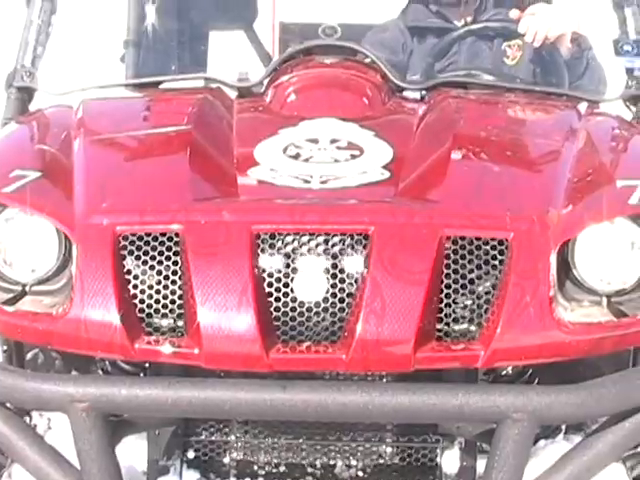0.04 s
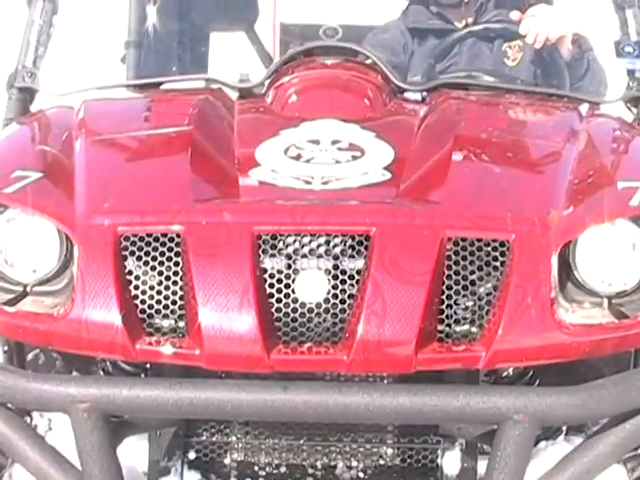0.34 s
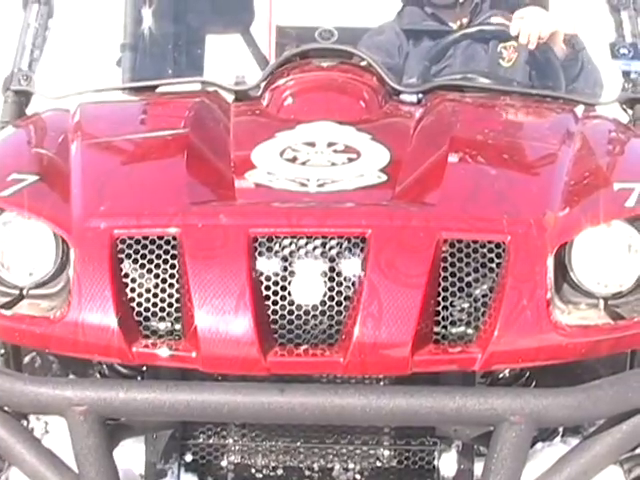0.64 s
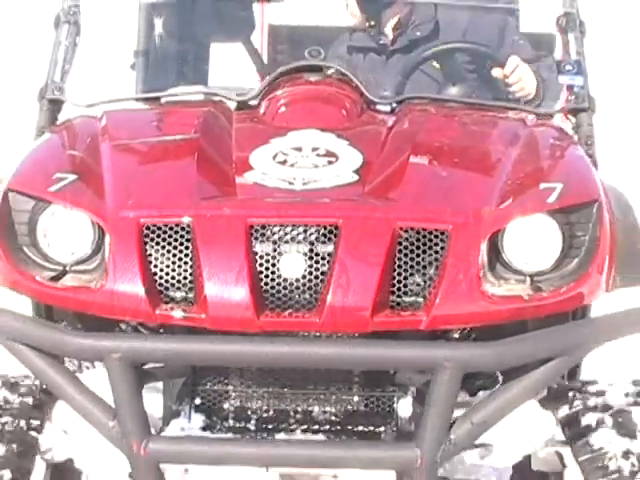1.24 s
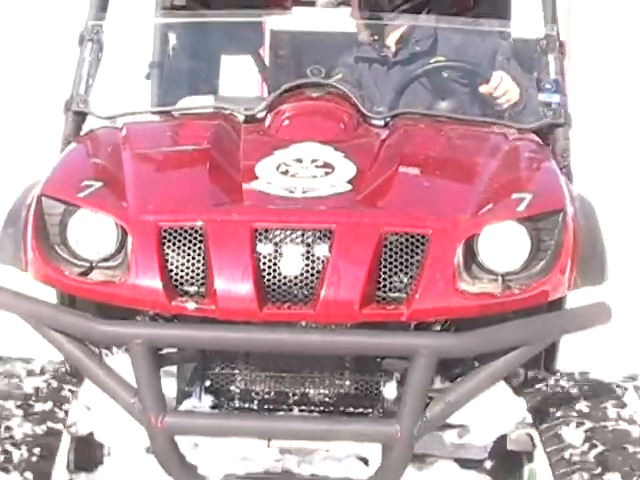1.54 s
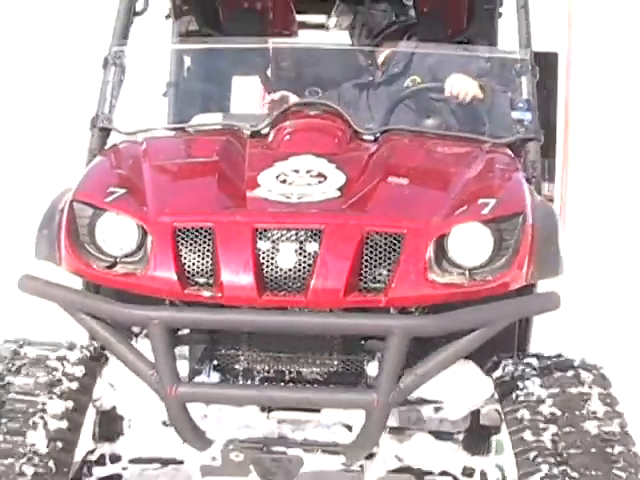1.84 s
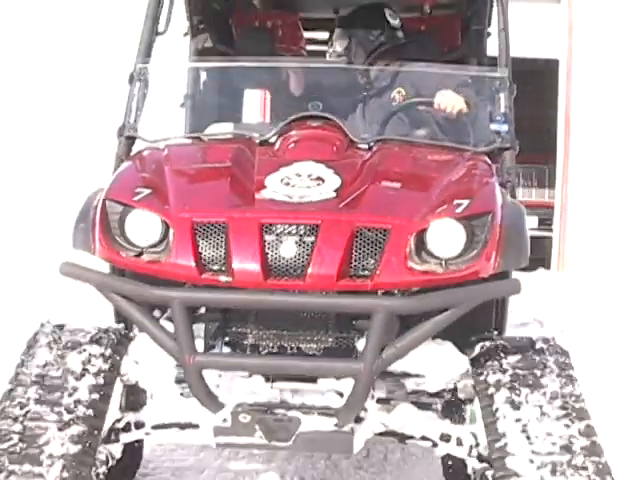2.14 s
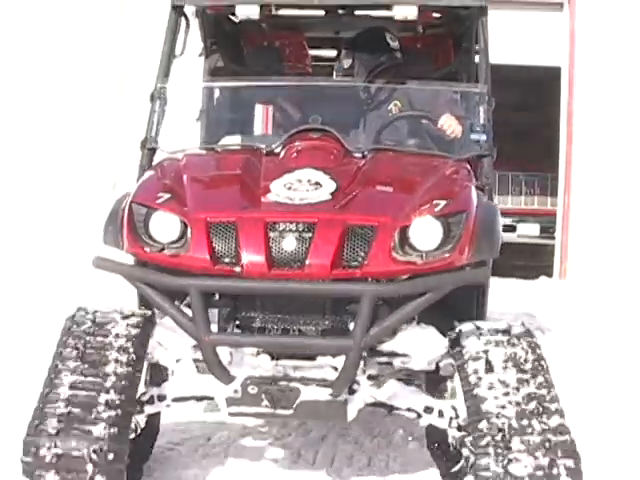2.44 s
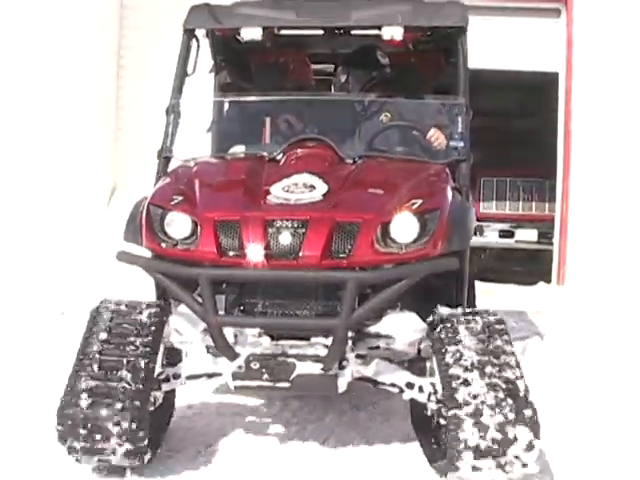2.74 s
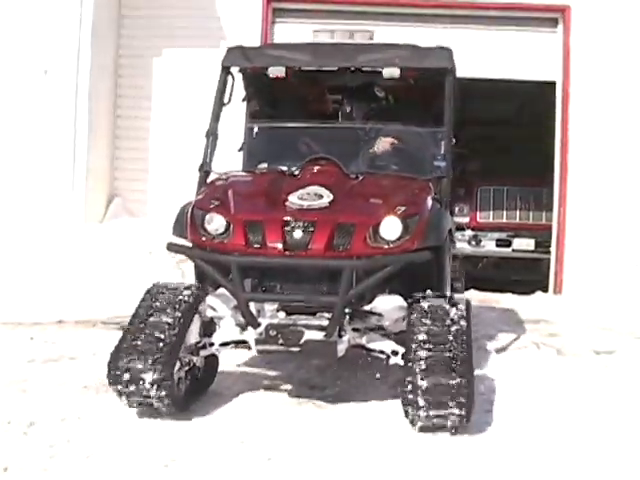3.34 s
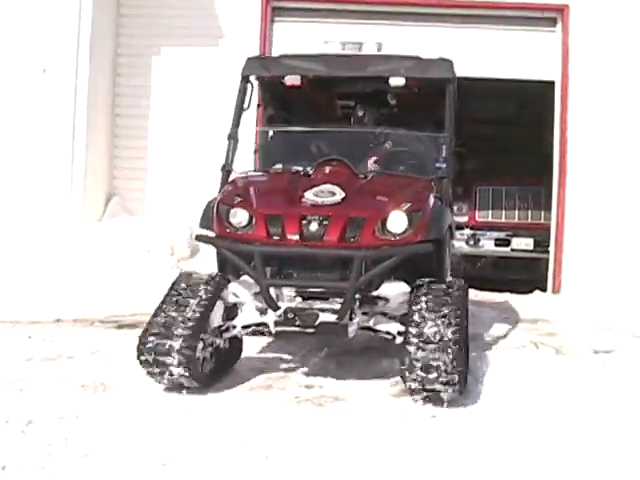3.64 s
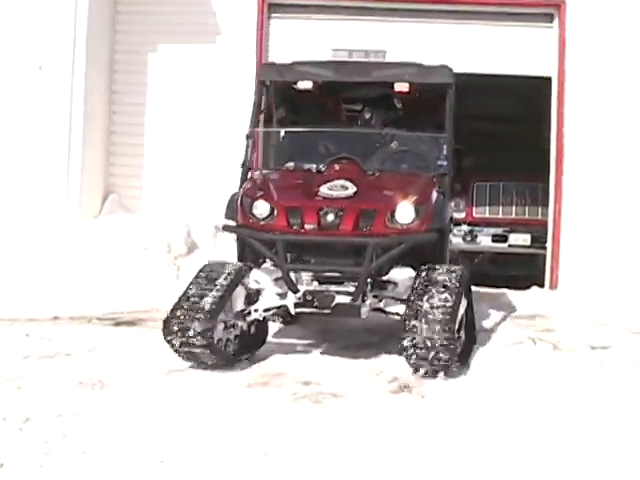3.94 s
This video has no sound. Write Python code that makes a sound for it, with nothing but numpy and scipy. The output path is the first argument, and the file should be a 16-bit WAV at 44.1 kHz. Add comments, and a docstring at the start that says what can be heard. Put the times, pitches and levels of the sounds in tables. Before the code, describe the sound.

A small off-road vehicle's engine idles close by with slow thumps. After a click it jumps to a louder, rattling drone that rises in pitch, while its tracks rustle and tick on icy snow.

```python
"""Slow thumps, about 13 a second: a single-cylinder utility vehicle on snow tracks idles close by.
With a click the sound jumps to the engine under load, the vehicle driving over snow.
Each firing sends a pulse down the exhaust, each gulp of air honks in the intake, and the panels rattle.
The drive belt whines briefly; the tracks rustle and tick on icy snow.
All of it reaches a stereo microphone pair whose sides differ in phase and level."""
import sys
import numpy as np
from scipy import signal
from scipy.fft import rfft, irfft, next_fast_len
from scipy.io import wavfile
from scipy.ndimage import uniform_filter1d

SR = 44100
rng = np.random.default_rng(int(sys.argv[2]) if len(sys.argv) > 2 else 0)


def master(y):
    """Save y as 16-bit WAV."""
    cut = np.clip(np.atleast_2d(y).T, -1, 1)
    pcm = np.round(cut * 32767)  # scale
    wavfile.write(sys.argv[1], SR, pcm.astype(np.int16))


N = 176400
TIME = np.arange(N) / SR
FFT_SIZE = next_fast_len(N + SR // 2, True)
HZ = np.maximum(np.arange(FFT_SIZE // 2 + 1) * SR / FFT_SIZE, 1)
IDLE_START_S, LOAD_START_S = .002, .834

# Engine speed under load: (time [s], firing rate [Hz])
LOAD_FIRING_RATE = [(0.847, 25.49), (1.2, 26.08), (1.62, 26.06), (1.9, 24.75), (2.2, 27.55), (2.45, 29.1),
                    (2.8, 31.57), (3.27, 33.34), (3.6, 32.87), (4.0, 32.35)]
# Intake honk following the throttle: (time [s], relative level [dB], starting pitch [Hz])
INTAKE_HONK = [(.85, -24, 844), (1.3, -26, 851), (1.65, -30, 857), (1.8, -35.5, 837), (2.2, -35, 810),
               (2.45, -29, 830), (2.7, -23, 848), (3.2, -22, 847), (3.48, -21, 846), (3.7, -20.5, 855),
               (4, -21, 857)]


def from_db(db):
    """Decibels to gain."""
    return 10 ** (np.asarray(db) / 20)


def in_time(rows, column=1):
    """One column of a time table at every sample."""
    rows = np.array(rows)
    return np.interp(TIME, rows[:, 0], rows[:, column])


def at_hz(points):
    """A spectrum table at every frequency."""
    hz, value = np.transpose(points)
    return np.interp(np.log(HZ), np.log(hz), value)


def colour(x, points):
    """Causal (minimum-phase) filter with the given gains in dB."""
    cepstrum = irfft(np.log(from_db(at_hz(points))), FFT_SIZE)
    cepstrum[1:FFT_SIZE // 2] *= 2
    cepstrum[FFT_SIZE // 2 + 1:] = 0
    return irfft(rfft(x, FFT_SIZE) * np.exp(rfft(cepstrum)), FFT_SIZE)[..., :N]


def poles(hz, width_hz):
    """Feedback coefficients of one resonance."""
    radius = np.exp(-np.pi * width_hz / SR)
    return np.array([1, -2 * radius * np.cos(2 * np.pi * hz / SR), radius ** 2])


def white(diffuse_db=-17.5):
    """Stereo noise of about 0 dB per Hz, mostly common to both sides."""
    mid, side = rng.standard_normal((2, N)) * np.sqrt(SR / 2)
    return mid + from_db(diffuse_db) * np.array([side, -side])


def impulses(times, gains):
    """One impulse at each time."""
    train = np.zeros(N)
    inside = (times >= 0) & (times < TIME[-1])
    train[(times[inside] * SR).astype(int)] = gains[inside]
    return train


def engine_cycles(rate, start_s):
    """Running count of engine cycles since start_s."""
    return np.cumsum(rate * (TIME >= start_s)) / SR


def exhaust_pulses(rate, start_s, jitter_s=.00011, uneven_db=.5, count=120):
    """One pressure pulse for each firing, slightly uneven in time and strength."""
    timing, strength = rng.standard_normal((count, 2)).T
    times = np.interp(np.arange(count) + 1e-6, engine_cycles(rate, start_s), TIME, right=np.inf)
    firings = impulses(times + jitter_s * timing, from_db(uneven_db * strength))
    return firings * SR / (np.sqrt(2) * rate)  # low harmonics have an rms near 1


def engine_under_load(under_way_s=(2.15, 2.7), honk_gain_db=7.5):
    """Exhaust drone, intake honk and clatter; the drone changes colour as the vehicle gets under way."""
    # Exhaust pipe pulling away, then under way: (frequency [Hz], gain [dB])
    pulling_pipe = [(26, -48.5), (52, -35.5), (78, -22.5), (104, -17.5), (135, -29), (182, -21.5),
                    (210, -26), (234, -19), (283, -27.5), (335, -53.5), (700, -71), (2000, -105)]
    driving_pipe = [(33, -40.5), (65, -27), (98, -35), (130, -23), (162, -30), (200, -19.5), (232, -20),
                    (265, -24.5), (320, -34), (360, -43), (393, -37), (440, -47.5), (700, -78.5),
                    (2000, -100)]
    # Rattle of engine and panels: (frequency [Hz], gain [dB])
    rattle_colour = [(30, -63.5), (110, -44.5), (300, -52.5), (420, -52), (540, -46.5), (720, -56),
                     (1000, -63), (1220, -62.5), (1700, -71), (3000, -105.5)]
    # Strength of that rattle: (time [s], gain [dB])
    rattle_level = [(.85, -3.5), (1.1, -8.5), (1.65, -5), (2.15, -4), (2.45, -2), (2.8, -2.5), (3.2, -2),
                    (4, -2.5)]
    rate = in_time(LOAD_FIRING_RATE)
    pulses = exhaust_pulses(rate, LOAD_START_S)
    moving = np.interp(TIME, under_way_s, [0, 1])
    drone = colour(pulses * (1 - moving), pulling_pipe) + colour(pulses * moving, driving_pipe)
    honk = from_db(honk_gain_db + in_time(INTAKE_HONK)) * intake(rate, LOAD_START_S)
    rattle = from_db(in_time(rattle_level)) * clatter(pulses, rattle_colour)
    return silencer(drone) + honk + rattle


def engine_idling(honk_db=-39.5):
    """Close by, slow firings leave the pipe as separate thumps over light clatter and a faint honk."""
    # Wavering idle speed: (time [s], firing rate [Hz])
    firing_rate = [(0, 13.1), (.12, 13.4), (.27, 13.3), (.36, 13.9), (.55, 13.75), (.72, 12.95),
                   (.82, 13.7)]
    # Exhaust pipe at idle: (frequency [Hz], gain [dB])
    pipe = [(27, -44.5), (52, -47), (66, -27.5), (79, -19.5), (94, -36), (125, -35), (165, -24.5),
            (215, -23), (238, -23.5), (262, -48.5), (320, -53), (700, -62.5), (2000, -110)]
    # Rattle at idle: (frequency [Hz], gain [dB])
    rattle_colour = [(30, -60), (200, -44), (400, -61.5), (550, -58), (680, -67), (820, -57.5),
                     (930, -74.5), (1200, -69), (2300, -85), (3800, -81.5), (4350, -85), (4700, -82.5),
                     (5300, -90.5), (6800, -104), (9000, -104), (15000, -112)]
    rate = in_time(firing_rate)
    pulses = exhaust_pulses(rate, IDLE_START_S)
    rattle = clatter(pulses, rattle_colour)
    honk = from_db(honk_db) * intake(rate, IDLE_START_S)
    return colour(pulses, pipe) + rattle + honk


def silencer(drone, bass_edge_hz=90):
    """The chambers spread each pulse over the cycle; the deep bass follows its own level."""
    # Chamber resonances, near which the sound is held back: (frequency [Hz], width [Hz])
    chambers = [(104, 32.7), (282, 16.6)]
    # Deep bass under load: (time [s], gain [dB])
    bass_level = [(.85, 3), (2.05, -1.5), (2.4, -1.5), (2.8, -6.5), (3.2, 1.5), (4, 0.5)]
    for hz, width_hz in chambers:
        feedback = poles(hz, width_hz)
        drone = signal.lfilter(feedback[::-1], feedback, drone)  # all-pass
    bass = signal.sosfiltfilt(signal.butter(4, bass_edge_hz, fs=SR, output="sos"), drone)
    return drone + (from_db(in_time(bass_level)) - 1) * bass


def intake(rate, start_s, delay_s=.00657, uneven_db=.75, sag_hz_per_s=2480):
    """Each gulp of air gives a short honk that sags in pitch and rings on faintly."""
    attack_s, hold_s, release_s = .0045, .0055, .0061
    ring_db, ring_s = -7.5, .029
    cycles = engine_cycles(rate, start_s + delay_s)
    age = cycles % 1 / rate
    strength = from_db(uneven_db * rng.standard_normal(N))[cycles.astype(int)]
    gulp = np.interp(age, np.cumsum([0, attack_s, hold_s, release_s]), [0, 1, 1, 0])
    ring = from_db(ring_db) * np.sin(np.pi * np.minimum(age / ring_s, 1))
    mean_hz = in_time(INTAKE_HONK, column=2) - sag_hz_per_s * age / 2
    return strength * np.maximum(gulp, ring) * np.sin(2 * np.pi * mean_hz * age)


def clatter(pulses, spectrum, repeat_share=.55, ring_s=.13):
    """Engine and panels rattle partly alike on every cycle, partly at random."""
    age = TIME[:SR // 8]
    one_rattle = rng.standard_normal(len(age)) * np.exp(-age / ring_s)
    repeating = signal.fftconvolve(pulses, one_rattle)[:N]
    repeating *= np.sqrt(repeat_share * SR / 2) / repeating.std()
    return colour(repeating + np.sqrt(1 - repeat_share) * white(), spectrum)


def track_rush(throb_db=.5, lag_s=.0062, grain_db=1.48, grain_s=.0054):
    """Tracks and drive run over the snow with a grainy rush that throbs with the engine."""
    # Colour of the rush: (frequency [Hz], gain [dB])
    rush_colour = [(400, -76.5), (1000, -62), (1600, -65.5), (2300, -70), (4000, -74), (5200, -73.5),
                   (6000, -81.5), (7000, -92), (9300, -94), (11500, -108), (15000, -122)]
    # Swell of the rush: (time [s], gain [dB])
    rush_level = [(.85, -7), (1.65, -6), (2.15, -4), (2.8, -2.5), (3.25, 2), (3.48, 0), (3.7, 1.5),
                  (4, 1.5)]
    cycles = engine_cycles(in_time(LOAD_FIRING_RATE), LOAD_START_S + lag_s)
    throb = np.cos(2 * np.pi * cycles)
    grain = uniform_filter1d(rng.standard_normal(N), int(grain_s * SR))
    level_db = in_time(rush_level) + throb_db * throb + grain_db * grain / grain.std()
    return colour(white() * from_db(level_db), rush_colour)


def track_ticks(gain_db=3, decay_s=.004):
    """The tracks strike icy snow in short, bright bursts of noise."""
    # Strikes on the ice: (time [s], relative level [dB])
    strikes = [(1.9435, -44.5), (1.956, -52), (2.1892, -45), (2.2985, -44.5), (2.379, -36.5), (2.4744, -41),
               (2.5057, -43), (2.5694, -40.5), (2.727, -37.5), (3.1378, -44.5), (3.227, -57),
               (3.3844, -43.5), (3.554, -36.5), (3.581, -46.5), (3.6163, -40), (3.694, -44.5)]
    # Colour of a tick: (frequency [Hz], gain [dB])
    tick_colour = [(2000, -24.5), (5000, -10.5), (7000, -5), (9300, 5.5), (11500, -12.5), (15000, -17.5)]
    times, db = np.transpose(strikes)
    hits = impulses(times, from_db(db + gain_db))
    envelope = signal.lfilter([1], [1, -np.exp(-1 / (decay_s * SR))], hits + 1e-18)
    return colour(envelope * rng.standard_normal(N), tick_colour)


def drive_belt():
    """A brief rising whine as the belt takes up the load."""
    # Belt tone: (time [s], pitch [Hz], level [dB])
    whine = [(1.66, 480, -45.5), (1.75, 491.6, -25.5), (1.83, 525, -25), (1.92, 548, -36.5),
             (2.2, 557.4, -42.5), (2.5, 581, -45)]
    sounding = (TIME > whine[0][0]) & (TIME < whine[-1][0])
    tone = np.sqrt(2) * np.sin(2 * np.pi * np.cumsum(in_time(whine)) / SR)
    return sounding * from_db(in_time(whine, column=2)) * tone


def idle_whine(hz=4710, width_hz=140, gain_db=-78):
    """A thin, unsteady mechanical whine behind the idle: noise through one narrow resonance."""
    feedback = poles(hz, width_hz)
    feedforward = (1 - feedback[2]) / 2 * np.array([1, 0, -1])
    return from_db(gain_db) * signal.lfilter(feedforward, feedback, white())


def scene(jump_s=.8467, click_height=.54, click_decay_s=.0009):
    """The idle close by, then an abrupt jump with a click to the vehicle driving over snow."""
    standing = engine_idling() + idle_whine()
    driving = engine_under_load() + track_rush() + track_ticks() + drive_belt()
    click = -click_height * np.exp(-np.maximum(TIME - jump_s, 0) / click_decay_s)
    return np.where(TIME < jump_s, standing, driving + click)


def record(dry, hiss_db_per_hz=-112, stopband_hz=16700):
    """The two microphone ports differ in phase and level; faint hiss is added and the top is cut."""
    # Phase between the ports: (frequency [Hz], lead of the left [rad])
    port_phase = [(28, 1.77), (65, 1.35), (105, 0.96), (220, 0.5), (500, 0.29), (1720, 0.06), (5770, -1.22),
                  (9220, -2), (13000, -2), (20000, 0)]
    # Balance of the ports: (frequency [Hz], left minus right [dB])
    port_balance = [(70, 0), (130, -2), (250, -3), (600, 0.7), (1900, -2), (4000, -1.5), (8000, 2.5),
                    (14000, -1.5)]
    left = from_db(at_hz(port_balance) / 2) * np.exp(.5j * at_hz(port_phase))
    pad, latency = SR // 8, SR // 1500  # samples
    spectrum = rfft(np.pad(dry, ((0, 0), (pad, pad)), "reflect"), FFT_SIZE)
    start = pad - latency
    ports = irfft(spectrum * np.array([left, 1 / left]), FFT_SIZE)[:, start:start + N]
    hiss = from_db(hiss_db_per_hz) * np.sqrt(SR / 2) * rng.standard_normal((2, N))
    low_pass = signal.cheby2(16, 70, stopband_hz, fs=SR, output="sos")
    return signal.sosfilt(low_pass, ports + hiss)


dry = scene()
out = record(dry)
master(out)
```